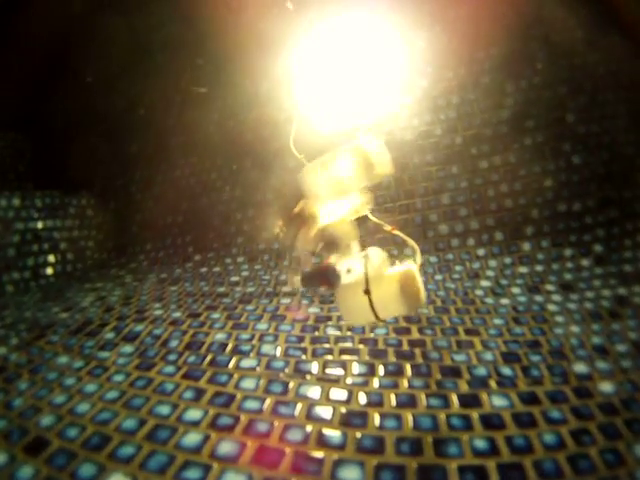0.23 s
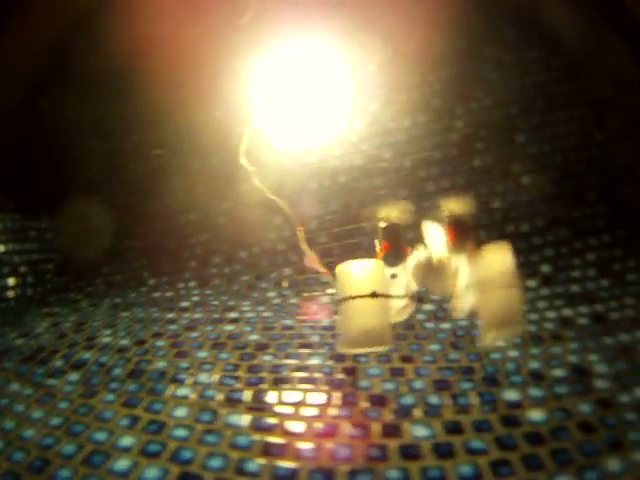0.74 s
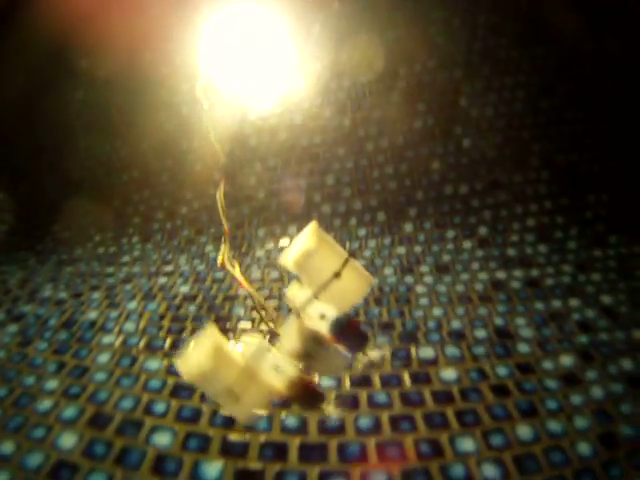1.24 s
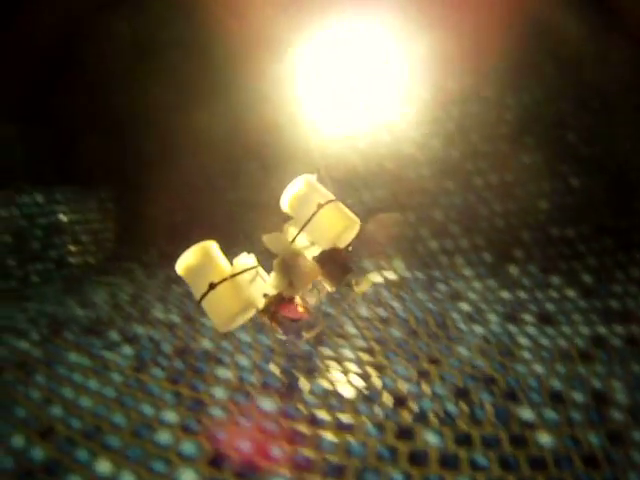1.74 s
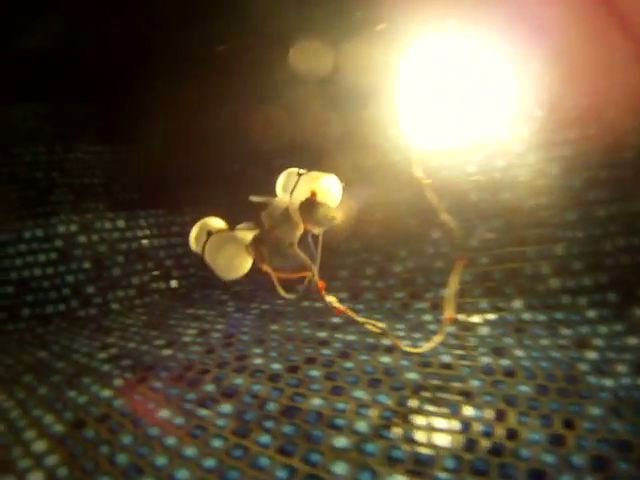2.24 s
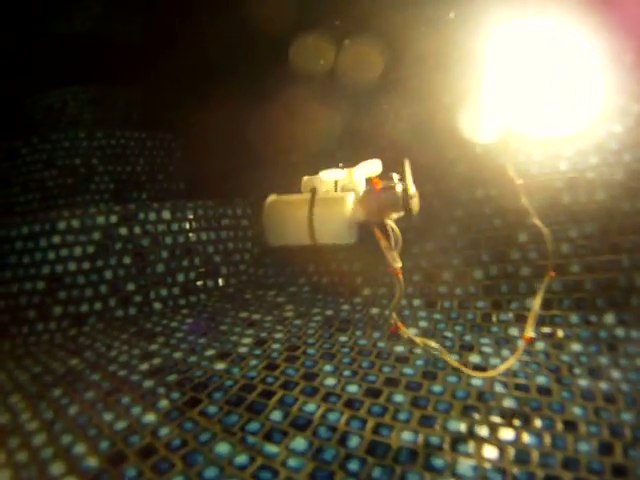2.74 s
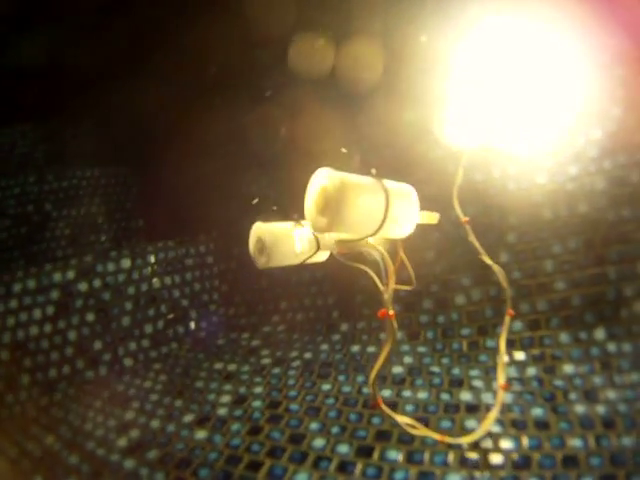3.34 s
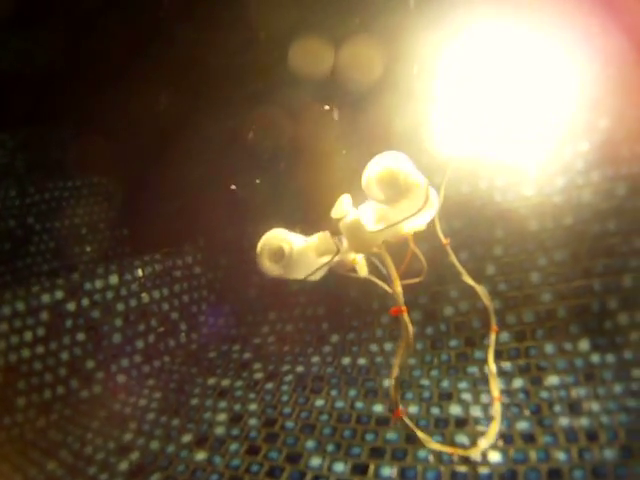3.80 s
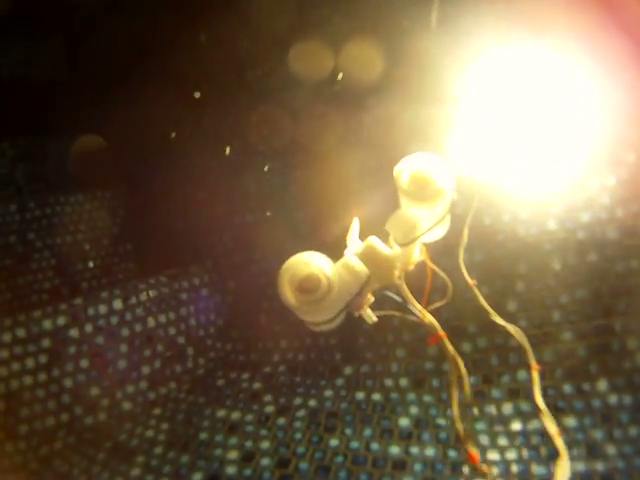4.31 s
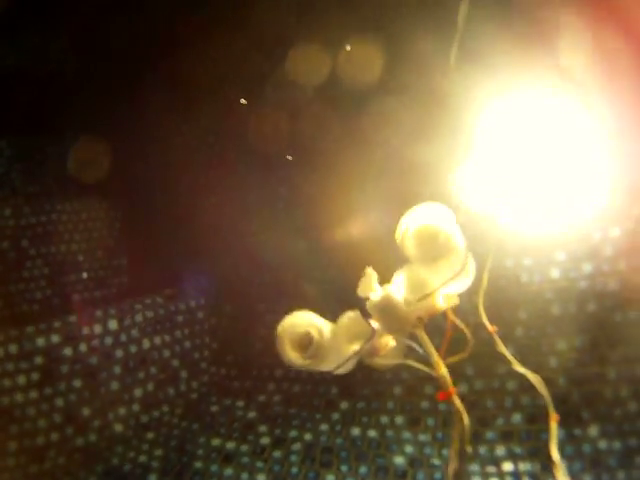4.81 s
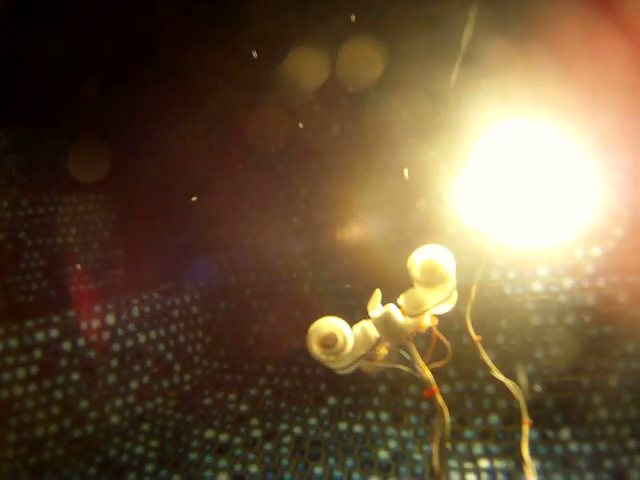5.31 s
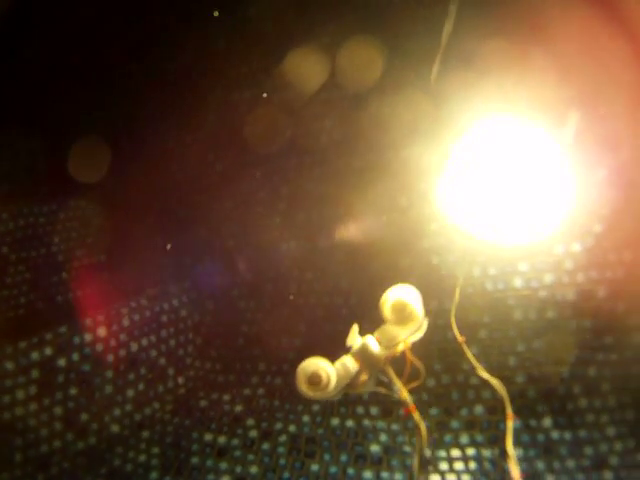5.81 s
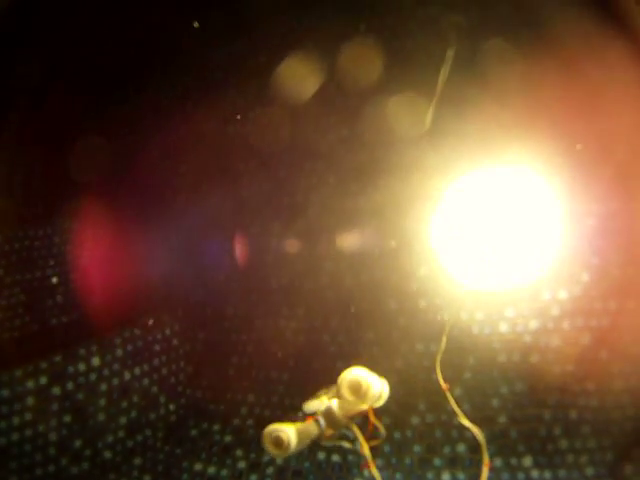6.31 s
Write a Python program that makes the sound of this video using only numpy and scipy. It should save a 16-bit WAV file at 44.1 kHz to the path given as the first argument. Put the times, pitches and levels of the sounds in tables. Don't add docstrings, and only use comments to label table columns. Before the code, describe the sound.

Rapid electrical knocks ring a boxy hull and camera case, close and mono-like, with muffled low end and a gritty treble edge. The strong opening buzz gives way to a weak lower spell, then about a second of rumbling near-silence with taps and knocks. A sharp switch snap brings a brief noisy burst; weak pulsing follows, slows, clicks off and restarts even slower with little bumps.

```python
import sys
import numpy as np
from scipy import signal
from scipy.fft import rfft, irfft, next_fast_len
from scipy.io import wavfile
from scipy.ndimage import uniform_filter1d, map_coordinates

SR = 44100
rng = np.random.default_rng(int(sys.argv[2]) if len(sys.argv) > 2 else 0)


def transcribe(u):
    v = np.clip(np.atleast_2d(u).T, -1, 1)
    q = np.round(v * 32767).astype(np.int16)
    wavfile.write(sys.argv[1], SR, q)


def nominal_scale(level):
    x = np.asarray(level, float) / 20
    return 10 ** x


N = 288841
t = np.arange(N) / SR

# (frequency [Hz], level per Hz [dB])
RUMBLE = [(7.1, -33), (12, -1), (44, -1.5), (70, -3), (87, -17.5), (114, -8.5), (145, -19.5), (214, -15),
          (245, -14.5), (300, -20), (390, -46), (660, -120)]
# (frequency [Hz], level per Hz [dB])
HISS = [(59, -34), (100, -4.5), (167, -7.5), (192, -13.5), (394, -12), (670, -15.5), (1160, -19.5),
        (2550, -24), (3780, -25.5), (5140, -29.5), (6000, -37), (7800, -68), (13200, -120)]
# (frequency [Hz], width [Hz], level [dB])
PUMP = [(58.6, 7.7, -66.5)]
# (time [s], half length [s], change [dB])
SURGES = [
    (1.9, 0.5, 1),
    (3.263, 0.12, 2.5),
    (4.45, 0.18, 1),
    (6.1, 0.76, -2),
]
WATER_DB, HISS_DB = -56, -62.5

# (time [s], peak [dB], pitch [Hz], snap [dB])
BUMPS = [(1.324, -32.5, 77.4, -6), (2.267, -44, 88.8, -2.5), (4.342, -25.5, 82.4, -5),
         (4.607, -35, 76, -12), (4.639, -35, 61.9, -33), (4.666, -35, 102, -29), (6.429, -43.5, 156, -12),
         (6.46, -46, 61.9, -7), (6.486, -48, 182, -16), (6.502, -49, 61.9, -13), (6.519, -43, 147, -9),
         (6.54, -50, 61.9, -11)]
# (time [s], peak [dB], hull [dB], float over hull [dB], drone over hull [dB])
CLICKS = [(2.21, -37, 5, -5.5, -4.5), (2.221, -54.5, 14.5, -14, 3), (3.481, -58, -2, 8, -2),
          (3.5045, -44, -6, 13, -5), (3.512, -52, 1.5, 9.5, -18), (4.096, -63, 14, -7, -16),
          (4.438, -13.5, -8, -8.5, -10.5), (6.072, -58, 7, -13, -3), (6.1174, -31, 2.5, -6, -3),
          (6.1215, -31, -2.2, -1.5, -3), (6.13, -35.5, 5.5, -12, -15), (6.1384, -43, 0, 7, 1.5),
          (6.4355, -42.5, 1, 0, -17), (6.462, -50, 8, -12, -14), (6.485, -54, 9.5, -13, -13),
          (6.4957, -50.5, 12, -12, -29), (4.3444, -56.5, 14, -17, 1)]
# (time [s], peak [dB], hull [dB], latch [dB], length [s])
RATTLES = [(.001, -23, -7, -20, 0.0064), (1.816, -30, -19, -26, 0.0034), (2.319, -56, 8, 4, .0014),
           (2.503, -56.5, -12, 13, .0012), (3.489, -41, 2, -2.5, 0.013), (4.1784, -52.5, 6, 1, .0013),
           (4.323, -57, 10.5, -11, .0023), (4.347, -41, -28, -23, 0.01), (4.4112, -46, -9, -16, 0.0022),
           (4.426, -33, -4.5, -4, 0.017)]
# (frequency [Hz], width [Hz], level [dB])
SHELL = [(1624, 69, 5.5), (1980, 190, 3.5), (2400, 425, 7), (3600, 190, -5.5), (4470, 490, -18.5)]
CLICK_S = .0015
CLICK_LATCH_DB, RATTLE_DRONE_DB, RATTLE_FLOAT_DB = -15, -1.5, -11.5

# (frequency [Hz], width [Hz], level [dB])
DRONE = [(196, 20, -0.5), (266.7, 48, -1.5), (372, 86, -2), (132, 100, -14)]
HULL = [(482, 64, -4), (569.8, 60, 7)]
FLOAT = [(704, 123, -8), (746, 43, -2.5)]
UPPER_FLOAT = [(801.4, 46.3, 0.5)]
CASE = [(2089, 350, -1), (2300, 21, 2.5), (2453, 167, 3.15), (2600, 134, -0.7), (3140, 200, -15.5),
        (3370, 195, -15), (4050, 510, -24), (4630, 180, -26.5), (5650, 310, -29)]
LOWER_CASE = [(1103, 430, -5), (1233.5, 61, 2), (1470, 73, 2), (1663, 117, 3.5)]

# (on [s], off [s])
SWITCH = [
    (-.1, 2.228),
    (2.228, 3.515),
    (4.44, 4.75),
    (4.75, 6.115),
    (6.14, 6.7),
]
# (time [s], speed [turns/s])
SHAFT = [
    [(0.0, 34.35), (0.62, 32.13), (0.71, 32.93), (1.12, 31.74), (1.68, 33.15), (2.21, 32.21)],
    [(2.25, 20.25), (2.68, 22.41), (3.15, 20.56), (3.48, 20.44)],
    [(4.47, 22.76), (4.74, 19.96)],
    [(4.76, 22.66), (5.28, 19.85), (6.1, 18.03)],
    [(6.15, 14.23), (6.54, 13.2)],
]
# (shaft angle [sixths of a turn], level [dB])
KNOCKS = [
    [(.25, 7.5), (1.3, -4.5), (2.6, -12.5), (3.7, -7), (4.6, -5), (5.4, -10)],
    [(.15, .5), (2.2, -12), (4.1, 0)],
    [(.5, 2.5), (2.45, 1), (4.5, -1.5)],
    [(.2, 0), (1.1, -3), (2.75, 0), (3.7, -1.5)],
    [(0, 0), (2.05, 1), (3.95, -3)],
]
# (shaft angle [sixths of a turn], level [dB])
BUZZES = [
    [(.8, 8.5), (1.8, -3.7), (2.8, 7.5), (3.9, -1), (4.8, 3), (5.8, 7)],
    [(.9, 1), (2.7, -8), (4.1, -1.8)],
    [(.2, 8.5), (2.2, .1), (3.5, -20), (4.3, 3)],
    [(.6, 2), (1.65, 4.5), (2.7, -13), (3.85, 2), (4.8, -2), (5.8, -3)],
    [(.8, .1), (1.8, -1.5), (2.75, -1.5), (3.85, -1), (4.85, -1.5), (5.7, -8)],
]
# (drone [dB], hull [dB], float [dB], brushes [dB])
FRESH = [(-50.5, -45.5, -41.5, -49), (-67.5, -68, -64, -66), (-55.5, -48.5, -44, -49),
         (-69.5, -62.5, -61, -58), (-66.5, -62.5, -54.5, -53.5)]
# (drone [dB], hull [dB], float [dB], brushes [dB])
FADED = [(-5, -3.5, -8, -3), (-1.5, 7, 6, -2.5), (-11.5, -15.5, -13, -9), (-3, -8.5, -8, -10.5),
         (-5, 12.5, 0.5, -3.5)]
BEND = [1.36, 1.3, 1.8, 0.46, 1.34]
# (lower case [dB], upper float [dB])
FACING = [(2, -6), (2, -8), (-3, -6), (-5.5, -5.5), (-8, 1.5)]
HULL_LEAD = [.0048, 0, 0, 0, 0]
RIDING = [(.08, .17, .5), (.12, .75, 1), (.2, .8, .8), (.4, .55, .7), (.08, .35, 1)]
# (time [s], half length [s], extra knock roughness [0-1], buzz roughness [0-1], unevenness [0-1])
CHATTER = [
    (0, 1.05, .4, .45, .15),
    (2.3, .3, .5, .1, -.4),
]
# (time [s], half length
# [s], hull [dB], float [dB])
SWINGS = [
    (0.622, .2, -4.5, -1),
    (1.05, 0.33, -0.5, 2),
    (2.33, 0.064, 10, .5),
    (2.903, 0.24, 6.5, 5),
    (5.897, 0.032, 10.5, 0),
]
# (shaft angle [sixths of a turn], level [dB])
RAP = (5.85, -54.5)
# (time [s], half length [s], change [dB])
RAPPING = [
    (.5, .25, -4),
    (1.18, .26, 0),
]
# (time [s], level [dB])
TICKS = [(1.4, -74.5), (1.5, -71), (1.68, -69), (1.74, -63), (1.9, -66.5), (2.2, -69.5)]

HOLD_HZ = 12000


def unit(x):
    return x / np.sqrt(np.mean(x ** 2) + 1e-20)


def steady(x):
    power = np.abs(uniform_filter1d(x * x, size=SR // 4))
    return x / np.sqrt(power + 1e-20)


def swell(s, half):
    return np.exp(-((t - s) / half) ** 2)


def wobble(rate):
    knots = rng.standard_normal(int(N * rate / SR) + 4)
    return map_coordinates(knots, [t * rate])


def filtered(x, gain, causal=False):
    size = 2 * next_fast_len(N // 2 + 8192)
    response = gain(np.fft.rfftfreq(size, 1 / SR))
    if causal:
        cepstrum = irfft(np.log(response + 1e-6), size)
        cepstrum[1:size // 2] *= 2
        cepstrum[size // 2 + 1:] = 0
        response = np.exp(rfft(cepstrum))
    return irfft(rfft(x, size) * response, size)[..., :N]


def ring(x, modes):
    def gain(f):
        power = 0
        for hz, width, db in modes:
            power = power + (nominal_scale(db) / (1 + (2 * (f - hz) / width) ** 2)) ** 2
        return np.sqrt(power)

    return filtered(x, gain, causal=True)


def noise(points):
    hz, db = np.transpose(points)
    gain = lambda f: nominal_scale(np.interp(np.log(f + 1), np.log(hz), db))
    return unit(filtered(rng.standard_normal(N), gain))


def water():
    stir_db = WATER_DB + sum(db * swell(s, half) for s, half, db in SURGES)
    rumble = nominal_scale(stir_db) * unit(nominal_scale(wobble(8)) * noise(RUMBLE))
    pump = nominal_scale(PUMP[0][2]) * unit(ring(rng.standard_normal(N), PUMP))
    hiss = nominal_scale(HISS_DB + 0.78 * wobble(4.5)) * noise(HISS)
    return rumble + pump + hiss


def bumps():
    out = np.zeros(N + SR)
    u = np.arange(SR // 10) / SR
    push_shape = np.exp(-u / 0.0065) * (1 - np.exp(-u / 0.0028))
    snap_shape = np.exp(-u / 0.0016) * (1 - np.exp(-u / 0.0015))
    quick_start = 1.5 * (1 - np.exp(-u / 0.0011))
    for s, db, hz, snap_db in BUMPS:
        push = np.sin(2 * np.pi * hz * u + quick_start) * push_shape
        snap = nominal_scale(snap_db + 7.5) * np.sin(2 * np.pi * 340 * u) * snap_shape
        out[round(s * SR):][:len(u)] += nominal_scale(db + 8) * (push + snap)
    return out[:N]


def clicks():
    rows = []
    for s, db, hull, over, drone in CLICKS:
        rows.append((s, db, CLICK_S, hull + drone, hull, hull + over, CLICK_LATCH_DB))
    for s, db, hull, latch, length in RATTLES:
        rows.append((s, db, length, hull + RATTLE_DRONE_DB, hull, hull + RATTLE_FLOAT_DB + 1.5, latch))

    drives = np.zeros((5, 2, N + SR))
    drives[:, 1, 0] = 1
    u = np.arange(SR // 20) / SR
    for s, db, length, *balance_db in rows:
        rattle = 0.15 * rng.standard_normal(len(u)) * np.exp(-u / length)
        rattle[0] = 1
        rattle /= np.linalg.norm(rattle)
        push = rattle if length > CLICK_S else u == 0
        pushes = np.array([push, push, push, push, rattle])
        levels = nominal_scale(db - 2.5 + np.c_[[*balance_db, 0]])
        drives[:, 0, round(s * SR):][:, :len(u)] += levels * pushes

    # (frequency [Hz], width [Hz], level [dB])
    bodies = ([(264, 132, 1.7), (378, 79, -1.0)], [(563, 110, 0)], [(713, 213, 0)], [(1240, 156, 0)], SHELL)
    out = np.zeros(N)
    for db, drive, body in zip((1.5, 1.5, 4.5, -1.0, 0), drives, bodies):
        sound, blow = ring(drive[:, :N], body)
        out += nominal_scale(db) * sound / np.abs(blow).max()
    return out


def contacts(shaft, pattern, rough, uneven, lead_s, puff_s, drift_db):
    s, speed = np.transpose(shaft)
    speed = np.interp(t, s, speed)
    turns = np.cumsum(speed) / SR
    turns += lead_s * speed - turns[round(s[0] * SR)]
    blows, puffs = np.zeros(N), np.zeros(N)
    for sixths, db in pattern:
        since = (turns - sixths / 6) % 1
        size = nominal_scale(uneven * db + drift_db * wobble(rate=6))
        blows += size * (np.diff(since, prepend=0) < -.5)
        puffs += size * (0.25 + np.exp(-since / speed / puff_s))
    hiss = unit(puffs * rng.standard_normal(N))
    return np.sqrt(1 - rough) * unit(blows) + np.sqrt(rough) * hiss


def loose_rap():
    sixths, rap_db = RAP
    rap = contacts(SHAFT[0], [(sixths, 0)], .45, 1, lead_s=.0008, puff_s=.003, drift_db=1.5)
    level = sum(nominal_scale(rap_db + db) * swell(s, half) for s, half, db in RAPPING)
    return level * steady(ring(rap, LOWER_CASE + CASE[:4]))


def brush_ticks():
    ticks = contacts(SHAFT[0], BUZZES[0], .6, 1, lead_s=.0005, puff_s=.0006, drift_db=2)
    s, db = np.transpose(TICKS)
    return nominal_scale(np.interp(t, s, db)) * steady(ring(ticks, [(3950, 7700, 0)]))


def motors():
    starts, stops = np.transpose(SWITCH)
    spell = np.searchsorted(starts, t) - 1
    done = np.clip((t - starts[spell]) / (stops - starts)[spell], 0, 1) ** np.array(BEND)[spell]
    levels = np.transpose(FRESH)[:, spell] + np.transpose(FADED)[:, spell] * done
    for s, half, hull_db, float_db in SWINGS:
        levels[1:3] += np.c_[[hull_db, float_db]] * swell(s, half)

    riding = np.transpose(RIDING)[:, spell]
    for s, half, *extra in CHATTER:
        riding = riding + np.c_[extra] * swell(s, half)
    knock_rough, buzz_rough, uneven = riding

    knocks = [contacts(shaft, pattern, knock_rough, uneven, lead_s=0.00302, puff_s=0.0059, drift_db=2.7)
              for shaft, pattern in zip(SHAFT, KNOCKS)]
    buzzes = [contacts(shaft, pattern, buzz_rough, uneven, lead_s=.0008, puff_s=0.0045, drift_db=1.4)
              for shaft, pattern in zip(SHAFT, BUZZES)]
    knock, buzz = np.choose(spell, knocks), np.choose(spell, buzzes)
    lead = (np.array(HULL_LEAD)[spell] * SR).astype(int)
    early_knock = knock[np.minimum(np.arange(N) + lead, N - 1)]

    lower, upper = nominal_scale(np.transpose(FACING)[:, spell])
    drone = ring(knock, DRONE)
    hull = ring(early_knock, HULL)
    floating = ring(knock, FLOAT) + upper * ring(knock, UPPER_FLOAT)
    case = ring(buzz, CASE) + lower * ring(buzz, LOWER_CASE)
    hum = sum(nominal_scale(db) * steady(body) for db, body in zip(levels, (drone, hull, floating, case)))

    ramps = [np.minimum(t - a, b - t) / .006 + .5 for a, b in SWITCH]
    on = np.clip(np.clip(ramps, 0, 1).sum(0), 0, 1)
    return on * (hum + loose_rap()) + (spell == 0) * brush_ticks()


def scene():
    return np.tile(water() + bumps() + clicks() + motors(), (2, 1))


def roll_off(x):
    return signal.sosfilt(signal.butter(12, 15900, fs=SR, output="sos"), x)


def record(dry):
    def hold(f):
        return np.sinc(f / HOLD_HZ) / np.sinc(f / (4 * HOLD_HZ))

    def band_limit(f):
        return (f < HOLD_HZ / 2) / np.sqrt(1 + (f / 5750) ** 40) / np.maximum(hold(f), .5)

    base = filtered(dry, band_limit)
    mirrored = base * (1 + 2 * np.cos(2 * np.pi * HOLD_HZ * t + 2.0))
    held = filtered(mirrored, lambda f: hold(f) * (f < 15320))
    side = nominal_scale(-80.5) * noise([(20, -120), (60, -7.5), (3000, -8.0), (4500, -3.5), (5800, -17),
                               (7000, -9.5), (9400, -16.5), (9600, -120)])
    return roll_off(held + [[1], [-1]] * side)


dry = scene()
out = record(dry)
transcribe(out)
```